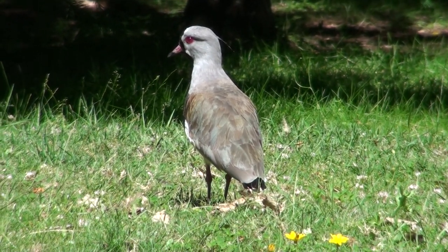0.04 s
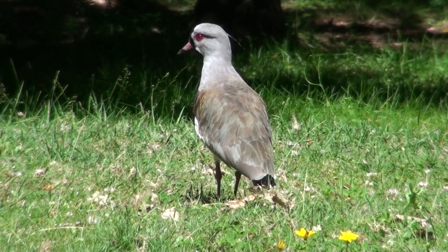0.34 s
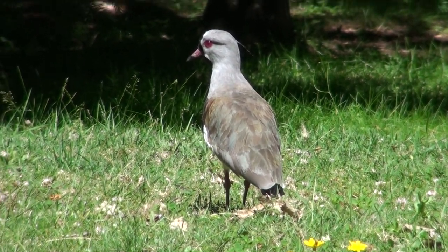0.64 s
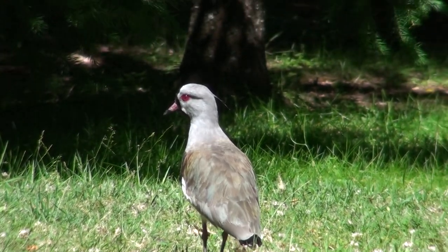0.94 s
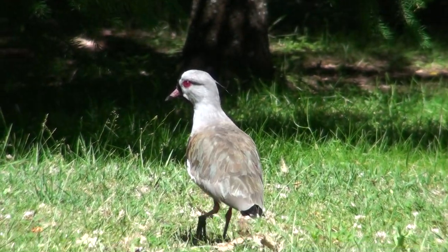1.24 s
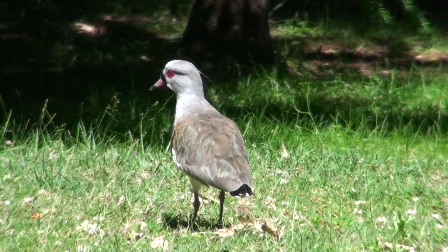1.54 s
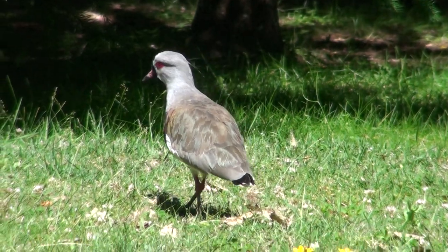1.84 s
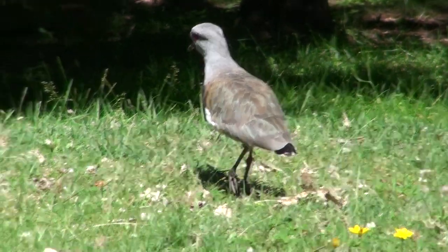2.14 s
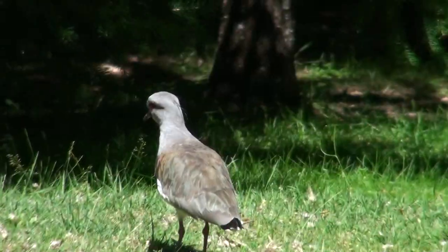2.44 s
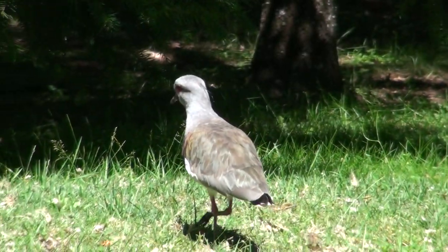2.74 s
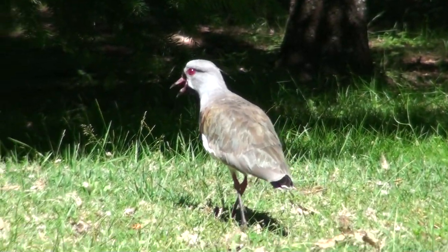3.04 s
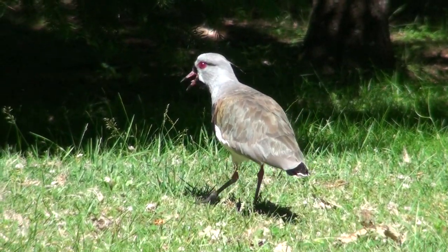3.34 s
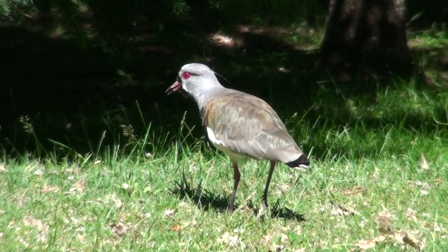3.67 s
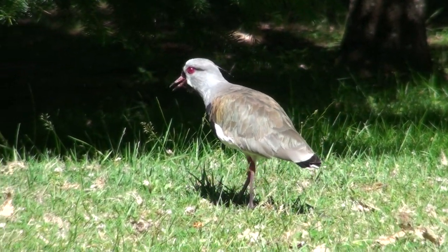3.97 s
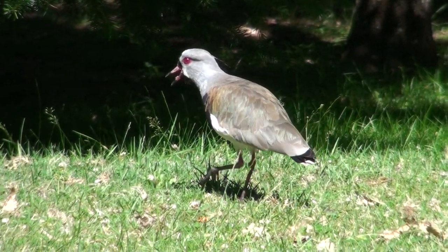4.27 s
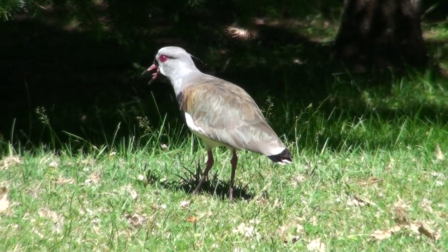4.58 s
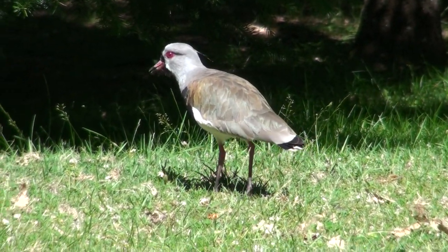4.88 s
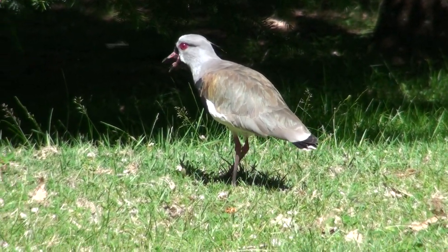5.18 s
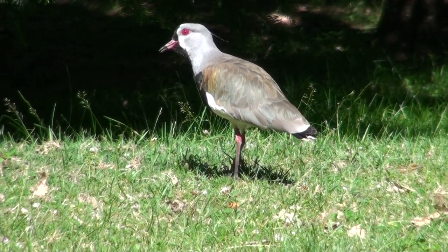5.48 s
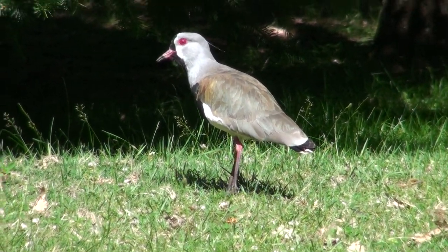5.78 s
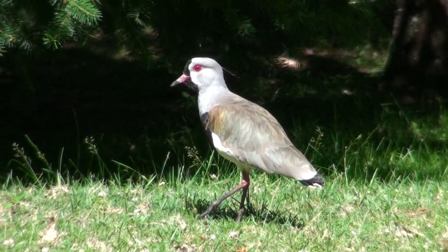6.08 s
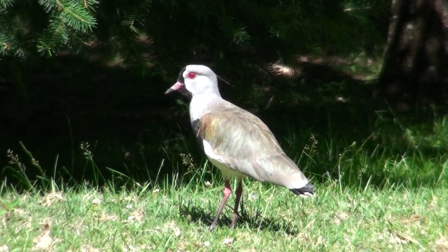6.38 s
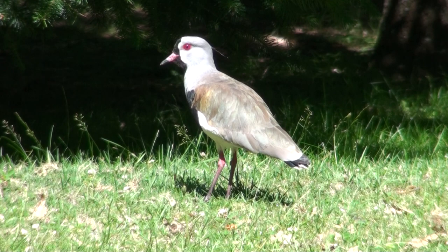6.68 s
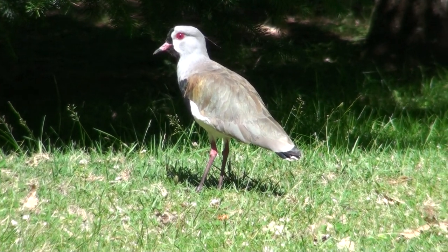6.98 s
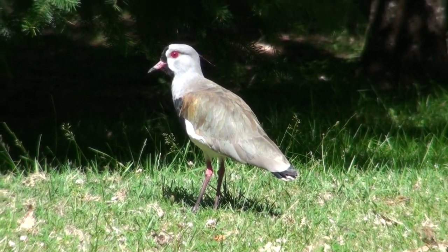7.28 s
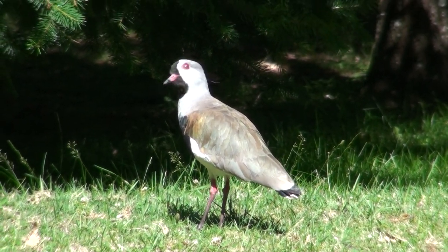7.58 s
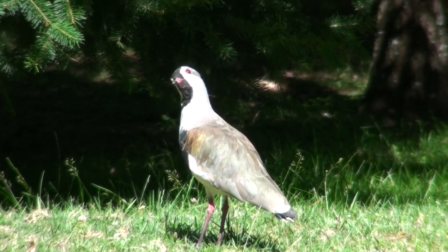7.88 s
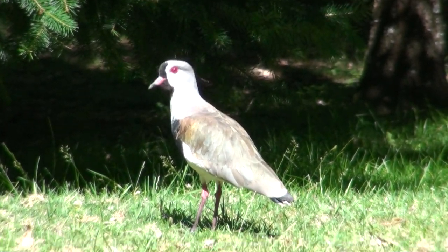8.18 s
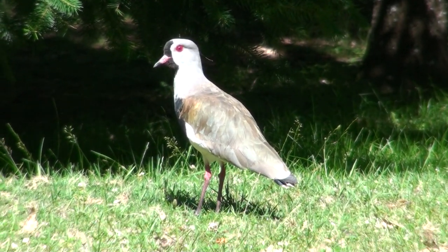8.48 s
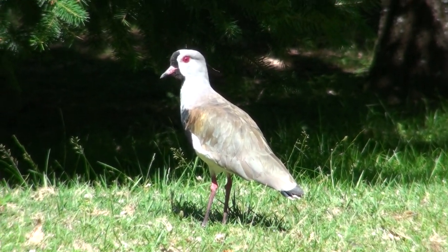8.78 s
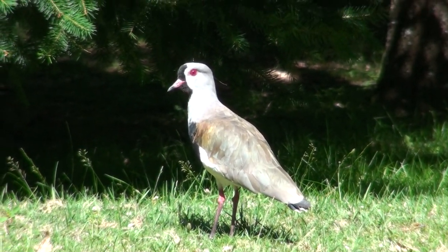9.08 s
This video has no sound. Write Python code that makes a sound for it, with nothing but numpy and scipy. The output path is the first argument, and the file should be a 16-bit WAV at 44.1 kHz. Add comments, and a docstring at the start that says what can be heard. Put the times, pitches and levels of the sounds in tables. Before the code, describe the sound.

A lapwing squawks six times in quick, even succession, high and rasping, near the centre of a stereo microphone on open grass. The trees return a soft echo. Before and after the calls there is only a low rumble of far traffic and scattered faint songbird notes. Late on come one hoarse, distant answering call and two small clicks right by the microphone.

```python
"""Distant traffic drones behind a lawn, and small birds whistle far off. Then a lapwing, near and almost
straight ahead of the stereo microphone, gives six harsh squawks: harmonics from its syrinx, shaped by
throat and bill, whose pitch flicks up and down, then collapses. Grass and trees scatter the calls back.
Near the end a second lapwing answers from far away, and two small clicks sound close to the microphone."""
import sys
import numpy as np
from scipy import signal
from scipy.fft import rfft, irfft
from scipy.io import wavfile
from scipy.ndimage import map_coordinates

SR = 44100
rng = np.random.default_rng(int(sys.argv[2]) if len(sys.argv) > 2 else 0)


def int16_out(signal):
    """Quantize to a 16-bit WAV file."""
    q = np.round(np.clip(np.atleast_2d(signal).T, -1, 1) * 32767)
    wavfile.write(sys.argv[1], SR, q.astype(np.int16))


N = 411012
TIME = np.arange(N) / SR
FREQS = np.maximum(np.arange(N // 2 + 1) * SR / N, 1)
CUTOFF_HZ = 16500


def from_db(db):
    """Decibels to gain."""
    return 10 ** (np.asarray(db) / 20)


def rms_one(x):
    """Scale to unit power."""
    return x / np.sqrt(np.mean(x ** 2) + 1e-20)


def at_hz(points, hz):
    """Read a curve on a log-frequency axis."""
    knots_hz, values = np.transpose(points)
    return np.interp(np.log(hz), np.log(knots_hz), values)


def drift(rate_hz, size):
    """A smooth random wander with a spread of about 1."""
    knots = rng.standard_normal(size)[:int(size * rate_hz / SR) + 4]
    return map_coordinates(knots, [np.arange(size) * rate_hz / SR], order=2, mode="nearest")


def add(track, start_s, sound):
    """Mix a sound into a track at a time."""
    i = int(start_s * SR)
    track[i:i + len(sound)] += sound[:N - i]


def stereo_noise(spectrum):
    """Coloured noise reaching the microphone from all round; rms 1."""
    # how alike left and right are: frequency_hz, correlation
    likeness = [(60, 0.99), (140, 1), (300, 0.68), (700, 0.5), (1400, 0.42), (3000, 0.67), (7000, 0.16),
                (10000, 0.62), (13000, 1)]
    mid, side = rfft(rng.standard_normal((2, N)))
    alike = at_hz(likeness, FREQS)
    pair = np.sqrt(1 + alike) * mid + np.sqrt(1 - alike) * side * [[1], [-1]]
    return rms_one(irfft(pair * from_db(at_hz(spectrum, FREQS)), N))


def microphone_hiss(level_db=-72):
    """The microphone's own steady noise."""
    # colour of the hiss: frequency_hz, gain_db
    colour = [(300, -16), (2500, 5), (5000, 0), (7500, -1), (10300, -6.5), (12500, -2), (16000, -14)]
    return from_db(level_db) * stereo_noise(colour)


def hum(start_s, end_s, hz, level_db, waver, swell_db):
    """A far tone that swells and fades, wavering on its way through the air."""
    passing = np.sin(np.pi * np.clip((TIME - start_s) / (end_s - start_s), 0, 1)) ** 0.71
    phase = 2 * np.pi * np.cumsum(hz * (1 + waver * drift(30, N))) / SR
    return passing * from_db(level_db + swell_db * drift(14, N)) * np.sqrt(2) * np.sin(phase)


def traffic(rumble_trim_db=0.5, tyre_trim_db=4.0):
    """Rumble, tyre noise and engine drones from a far road, with a thin sinking whine."""
    # loudness of the road before the trims: time_s, rumble_db, tyre_db
    road_levels = [(0.0, -65, -68.5), (2.18, -64, -68.5), (2.8, -63.5, -67.5), (4.38, -61, -62),
                   (7.27, -61, -62.5), (9.32, -61.5, -64.5)]
    # colours of rumble and tyres: frequency_hz, gain_db
    rumble_colour = [(20, -26), (35, -6), (52, -0.5), (85, 1.5), (130, -1.5), (170, -8), (250, -18.5),
                     (500, -34)]
    tyre_colour = [(120, -7), (280, -0.5), (420, -2), (700, 0.5), (1000, 1.5), (1400, -1.5), (2000, -6),
                   (3000, -10), (5000, -21.5), (9000, -29.5)]
    # passing engines, each gliding steadily: start_s, end_s, first_hz, last_hz, level_db
    passes = [(2.3, 10.2, 61.8, 58.36, -60), (5.3, 9.3, 107, 135.9, -66), (6.4, 8.5, 286.2, 266, -71.5)]
    time_s, rumble_db, tyre_db = np.transpose(road_levels)
    rumble = from_db(np.interp(TIME, time_s, rumble_db) + rumble_trim_db) * stereo_noise(rumble_colour)
    tyres = from_db(np.interp(TIME, time_s, tyre_db) + tyre_trim_db) * stereo_noise(tyre_colour)
    engines = np.zeros(N)
    for start_s, end_s, first_hz, last_hz, level_db in passes:
        engine_hz = np.interp(TIME, [start_s, end_s], [first_hz, last_hz])
        engines += hum(start_s, end_s, engine_hz, level_db, waver=0.0123, swell_db=2.5)
    whine_span_s = (3.75, 5.94)
    whine_hz = 1522 - 43.9 * np.tanh((TIME - 5.07) / 0.33)  # sinks fastest at 5.07 s
    whine = hum(*whine_span_s, whine_hz, level_db=-62.5, waver=0.00394, swell_db=3)
    octave_below = hum(*whine_span_s, whine_hz / 2, level_db=-71.5, waver=0.0092, swell_db=1)
    return rumble + tyres + engines + whine + octave_below


def scatter(sound, colour, decay, build_s):
    """Countless small echoes that build up, then die away, the treble first."""
    t = TIME[:SR * 3 // 2]
    grains = stereo_noise([(100, 0), (16000, 0)])[:, :len(t)]
    edges_hz = np.geomspace(300, CUTOFF_HZ, 11)
    response = np.zeros_like(grains)
    for low, high in zip(edges_hz, edges_hz[1:]):
        hz = np.sqrt(low * high)
        band = signal.sosfilt(signal.butter(2, [low, high], "band", fs=SR, output="sos"), grains)
        response += band * from_db(at_hz(colour, hz) - 60 * t / at_hz(decay, hz))
    response *= np.clip(t / build_s, 0, 1)
    response /= np.sqrt(np.sum(response ** 2) / 2)
    return signal.fftconvolve(sound[None], response, axes=1)[:, :N]


def tree_echo(sound):
    """The trees return a diffuse echo that is slow to build."""
    # colour of the echo: frequency_hz, gain_db
    colour = [(500, -17), (2000, 4.5), (3000, 0), (4200, 2), (6000, 1), (10000, -0.5), (15000, -45)]
    # its decay: frequency_hz, t60_s
    decay = [(500, 1.0), (3000, 0.89), (4500, 0.8), (7000, 0.77), (15000, 0.1)]
    return scatter(sound, colour, decay, build_s=0.054)


def grass_echo(sound):
    """The ground nearby scatters sound back almost at once."""
    # colour of the echo: frequency_hz, gain_db
    colour = [(500, 0), (2000, 3.5), (3000, 1.2), (6000, 1.4), (15000, 0.064)]
    # its decay: frequency_hz, t60_s
    decay = [(500, 1), (15000, 0.032)]
    return scatter(sound, colour, decay, build_s=0.0064)


def songbirds(note_s=0.08, seesaw=0.055, arch=0.082, warble=0.0178):
    """Far birds whistle gliding phrases of short arched notes, high and low in turn."""
    # song phrases: start_s, length_s, first_hz, last_hz, level_db
    phrases = [(0.602, .11, 2420, 2420, -70), (0.886, 0.12, 2890, 3100, -61),
               (1.101, 0.112, 2600, 2550, -66.5), (1.426, .04, 3250, 3060, -57),
               (1.98, .16, 3230, 3110, -64.5), (2.29, .16, 3800, 3970, -71), (6.5, .08, 2500, 2540, -63),
               (6.658, 0.32, 3230, 3450, -54), (6.929, 0.12, 2860, 2297, -57),
               (7.981, .11, 4400, 3950, -67), (8.68, 0.083, 3250, 3300, -65)]
    out = np.zeros(N)
    for start_s, length_s, first_hz, last_hz, level_db in phrases:
        along = np.linspace(0, 1, int(length_s * SR), endpoint=False)
        note, in_note = np.divmod(along * max(1, round(length_s / note_s)), 1)
        bend = seesaw * (-1) ** note - arch * (2 * in_note - 1) ** 2 + warble * drift(117, len(along))
        pitch_hz = (first_hz + (last_hz - first_hz) * along) * (1 + bend)
        envelope = from_db(level_db) * np.sqrt(np.sin(np.pi * in_note))
        add(out, start_s, envelope * np.sin(2 * np.pi * np.cumsum(pitch_hz) / SR))
    return out


def clicks(band_ratio=1.23):
    """Two clicks close to the microphone, each three broad resonances that die within milliseconds."""
    # resonances of the clicks: start_s, level_db, centre_hz, t60_s
    resonances = [(8.8645, -39, 9470, 0.0056), (8.8654, -37.5, 5400, 0.0072), (8.865, -43.5, 1100, .018),
                  (8.9230, -48.5, 5000, 0.0066), (8.9232, -42, 1090, 0.019), (8.9236, -49, 2200, 0.014)]
    out, t = np.zeros(N), TIME[:SR // 20]
    for start_s, level_db, hz, t60_s in resonances:
        band = signal.butter(2, [hz / band_ratio, hz * band_ratio], "band", fs=SR, output="sos")
        burst = rms_one(signal.sosfilt(band, rng.standard_normal(len(t))))
        add(out, start_s, from_db(level_db - 60 * t / t60_s) * burst)
    return out


def call_colour_db(hz):
    """The call as heard: broad resonances of throat and bill, narrow notches like a ground bounce's."""
    # resonances of throat and open bill: frequency_hz, gain_db
    resonances = [(950, -38), (1450, -33), (1950, -14), (2300, -9), (2650, -4.5), (3000, 0.5), (3300, -8.5),
                  (4200, -7), (5000, -17), (5750, -13.5), (6700, -22.5), (10100, -22.5), (11300, -28.5),
                  (13400, -39), (15500, -59)]
    # one slight peak, then narrow notches as from a ground bounce: centre_hz, half_width_hz, gain_db
    notches = [(3877, 113, 0.5), (4660, 87, -11), (5230, 120, -5.5), (6070, 166, -13.5), (6830, 45, -25),
               (8010, 84, -7), (9380, 60, -18), (10735, 310, -14)]
    notch_db = sum(db * np.exp(-((hz - centre) / width) ** 2) for centre, width, db in notches)
    return at_hz(resonances, hz) + notch_db


def flicks(t, spacing_s, rise_hz, flick_ratio, arch_hz=32.7):
    """Hz added to the pitch: three sharp flicks, each lower than the one before, then a gentle arch."""
    # upward flicks of the voice: place_in_spacings, half_length_s
    timing = [(1.0, .0078), (2.04, 0.00786), (2.88, .0058)]
    bumps = [(place, half_s, rise_hz * flick_ratio ** k) for k, (place, half_s) in enumerate(timing)]
    bumps.append((4.1, 0.01292, arch_hz))
    return sum(hz * np.exp(-np.abs((t - place * spacing_s) / half_s) ** 3) for place, half_s, hz in bumps)


def squawk(call, jitter, rasp_db, rise_hz):
    """One lapwing call: syrinx harmonics sweep through throat resonances and ground-bounce notches."""
    start_s, end_s, first_hz, last_hz, source_db, first_tilt, last_tilt, tuning, spacing_s, ratio = call
    length_s = end_s - start_s
    size = int((length_s + 0.008) * SR)
    t = np.arange(size) / SR
    glide_hz = np.interp(t, [0, length_s], [first_hz, last_hz])
    snap = 1 + 0.345 * np.exp(-t / 0.00192)  # the syrinx starts tight and snaps down onto its note
    collapse = 1 - 0.26 * np.exp((t - length_s) / 0.013)  # the pressure gives out
    flick_hz = flicks(t, spacing_s, rise_hz, ratio)
    unsteady = 1 + jitter * drift(700, size) + 0.0071 * np.exp(-t / 0.11) * drift(100.9, size)
    pitch_hz = (glide_hz * snap * collapse + flick_hz) * unsteady
    phase = 2 * np.pi * np.cumsum(pitch_hz) / SR
    hoarseness = from_db(rasp_db + 9 * flick_hz / 150)  # every flick strains the voice and makes it rasp
    tilt = np.interp(t, [0, length_s], [first_tilt, last_tilt])
    slack_db = -7.28 * np.exp((t - length_s) / 0.016)  # a slackening syrinx loses upper harmonics first
    voice = np.zeros(size)
    for k in range(1, 18):
        hz = k * pitch_hz
        syrinx_db = tilt * np.log2(hz / 3000) + slack_db * np.log(k)
        flutter_db = 2 * np.sqrt(k / 6) * drift(101.9, size)
        rasp = hoarseness * np.sqrt(k) * drift(900, size)
        gain = from_db(call_colour_db(hz / tuning) + syrinx_db + flutter_db) * (hz < CUTOFF_HZ)
        voice += gain * (np.sin(k * phase) + rasp * np.cos(k * phase))
    attack_db = -18 * np.clip(1 - t / 0.0067, 0, 1)
    shimmer_db = 1.4 * drift(246.2, size)
    edge_fade = np.clip(np.minimum(t, t[-1] - t) / 0.001, 0, 1)
    return voice * edge_fade * from_db(source_db + attack_db + shimmer_db)


def far_lapwing(foliage_hz=3900):
    """One short, hoarse answer; the long way through foliage takes the treble off."""
    # the answering call: columns as in near_lapwing
    calls = [(8.238, 8.335, 901, 871, -47, 2.5, 1, 0.85, 0.0285, .5)]
    out = np.zeros(N)
    for call in calls:
        add(out, call[0], squawk(call, jitter=0.021, rasp_db=-14, rise_hz=13))
    return signal.sosfilt(signal.butter(4, foliage_hz, fs=SR, output="sos"), out)


def near_lapwing():
    """Six squawks with strong pitch flicks from the bird on the lawn."""
    # calls: start_s, end_s, first_hz, last_hz, source_db, first_tilt_db_per_octave,
    # last_tilt_db_per_octave, colour_tuning_ratio, flick_spacing_s, flick_to_flick_ratio
    calls = [(2.948, 3.175, 891, 946.5, -26.5, -5.5, 3, 0.96, 0.037, .25),
             (3.424, 3.608, 949, 1028, -21, -0.5, 0.5, 1.006, 0.035, 0.51),
             (3.831, 4.012, 948, 1030, -20.5, -0.5, 0, 1.0, 0.031, .77),
             (4.220, 4.392, 940.6, 981.7, -21, 0.5, 1, 0.98, 0.033, .66),
             (4.632, 4.806, 953, 1014, -20.5, -1, -0.5, 1.003, .0325, .65),
             (5.146, 5.333, 974, 1015, -21, -2, -1.5, 1.02, 0.033, 0.75)]
    out = np.zeros(N)
    for call in calls:
        add(out, call[0], squawk(call, jitter=0.0069, rasp_db=-26.5, rise_hz=176.2))
    return out


def off_centre(sound, pan_db=0.34, lag_s=8e-6):
    """The near bird stands just off centre: the left channel is a touch louder and later."""
    sides = np.array([[1], [-1]])
    delay = np.exp(-2j * np.pi * FREQS * lag_s * sides / 2)
    return from_db(pan_db * sides) * irfft(rfft(sound) * delay, N)


def scene(grass_db=-18, near_echo_db=-17, far_direct_db=-5.5, far_echo_db=-6):
    """At the microphone the near bird is mostly direct sound, the far ones as much echo as direct."""
    near = near_lapwing()
    far = far_lapwing() + songbirds()
    direct = off_centre(near) + from_db(far_direct_db) * far
    grass = grass_echo(from_db(grass_db) * near)
    trees = tree_echo(from_db(near_echo_db) * near + from_db(far_echo_db) * far)
    return direct + grass + trees + clicks() + traffic() + microphone_hiss()


def record(dry):
    """A steep low-pass cuts the highest treble."""
    return signal.sosfiltfilt(signal.ellip(10, 0.1, 70, CUTOFF_HZ, fs=SR, output="sos"), dry)


dry = scene()
out = record(dry)
int16_out(out)
```